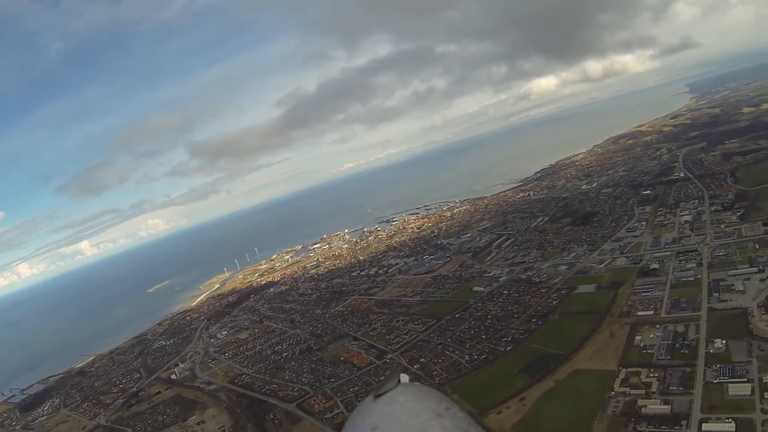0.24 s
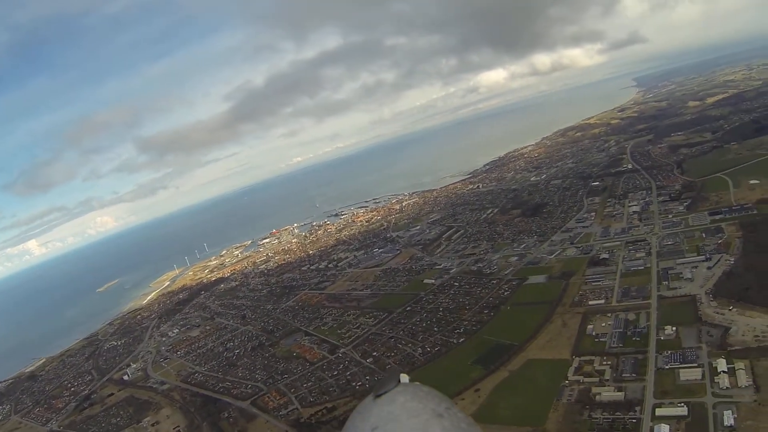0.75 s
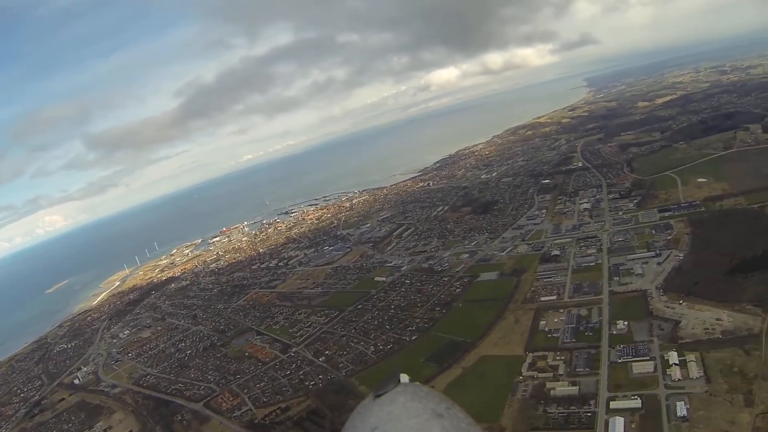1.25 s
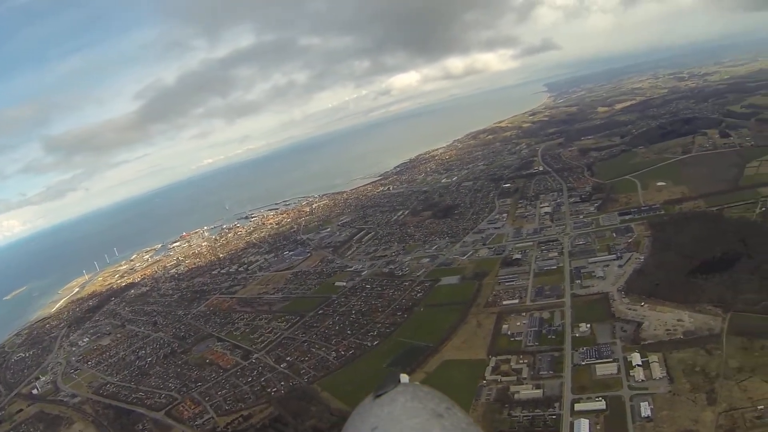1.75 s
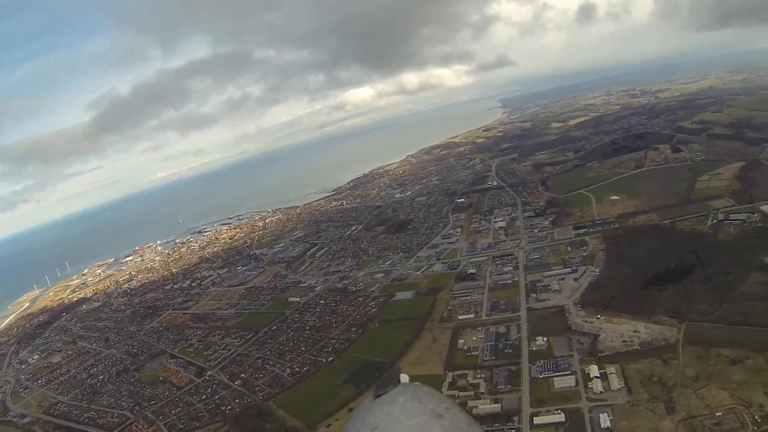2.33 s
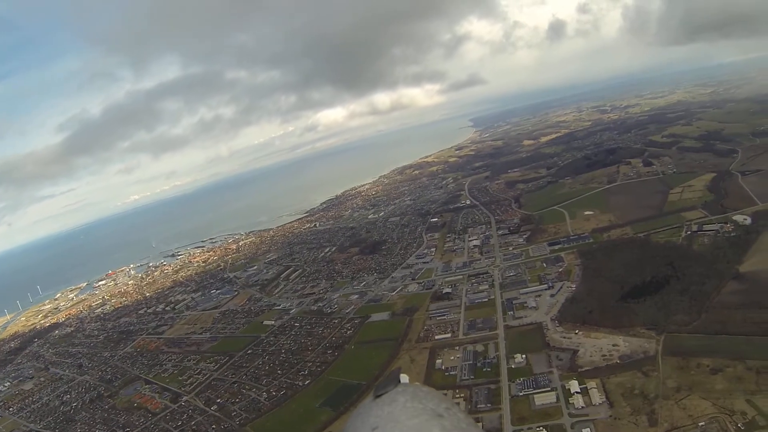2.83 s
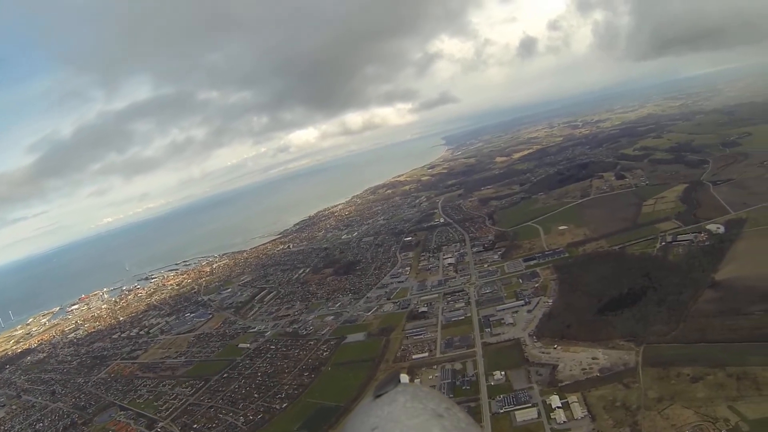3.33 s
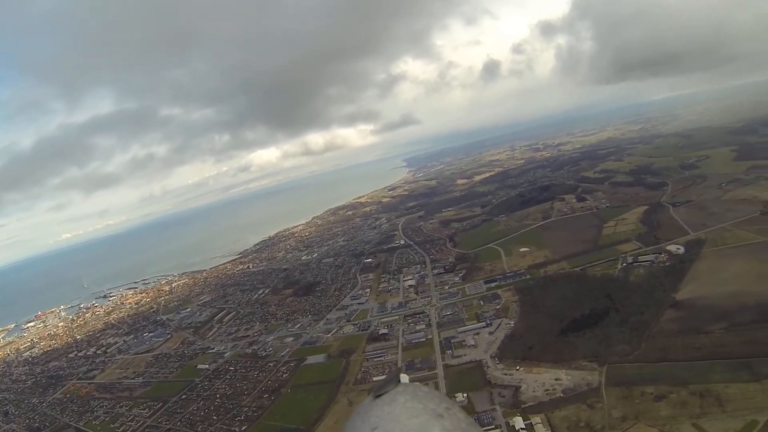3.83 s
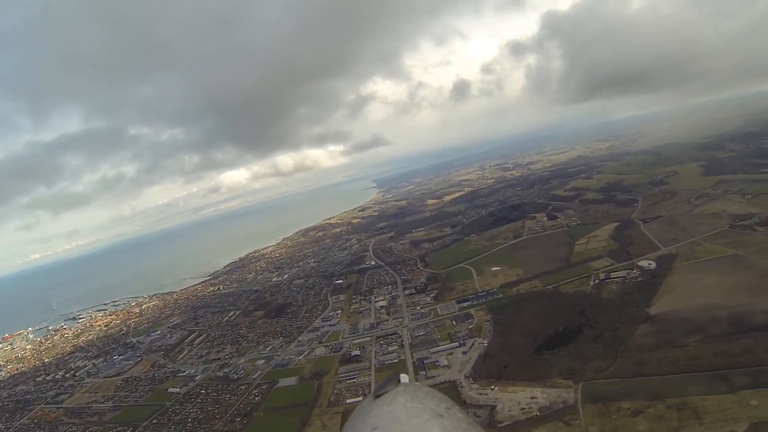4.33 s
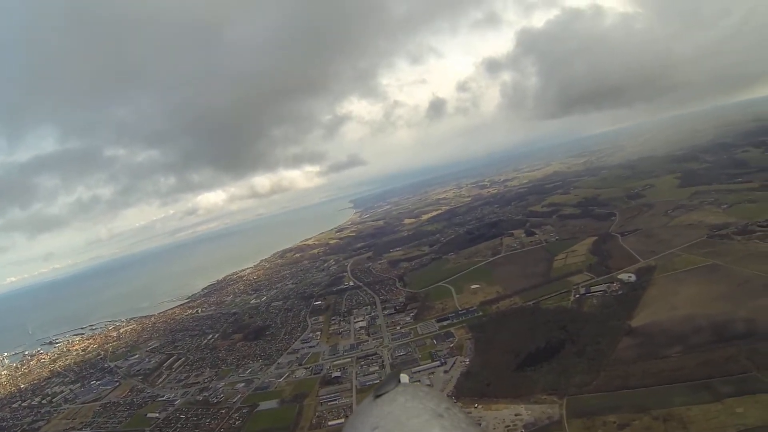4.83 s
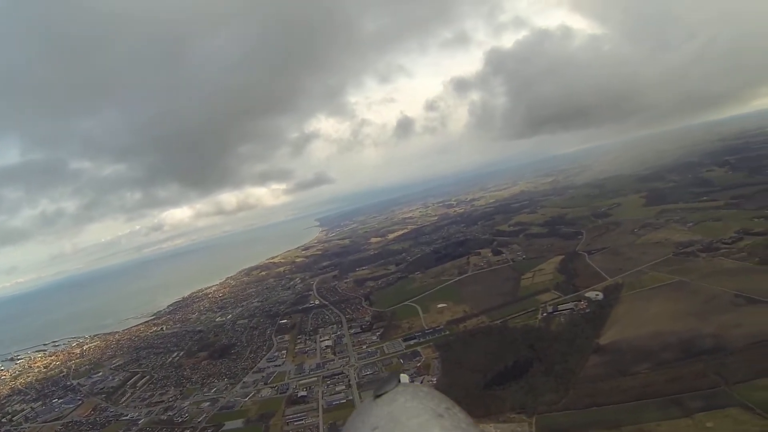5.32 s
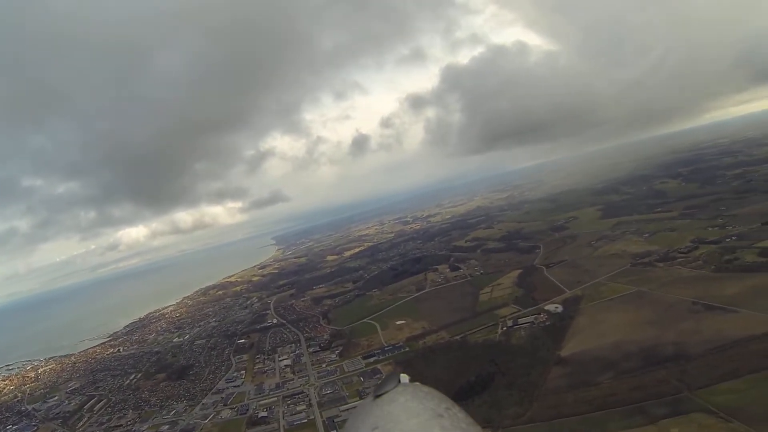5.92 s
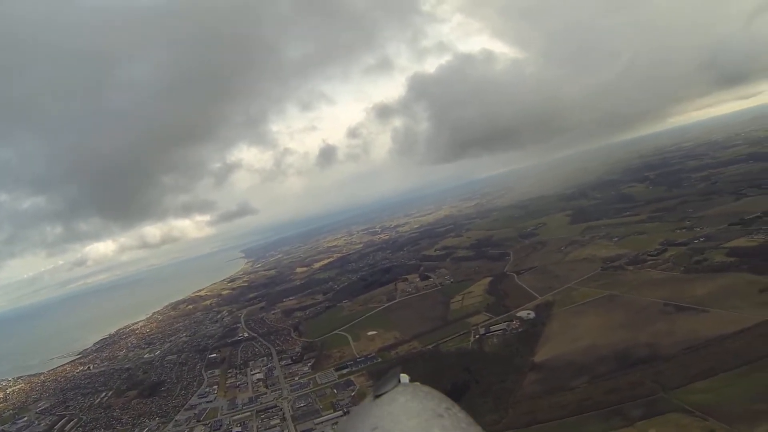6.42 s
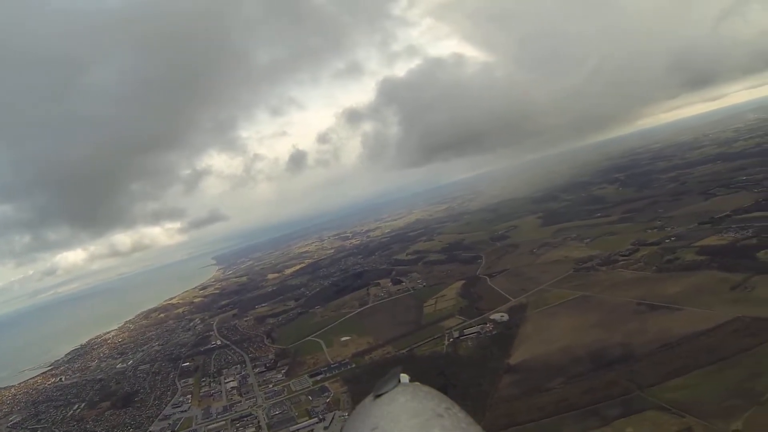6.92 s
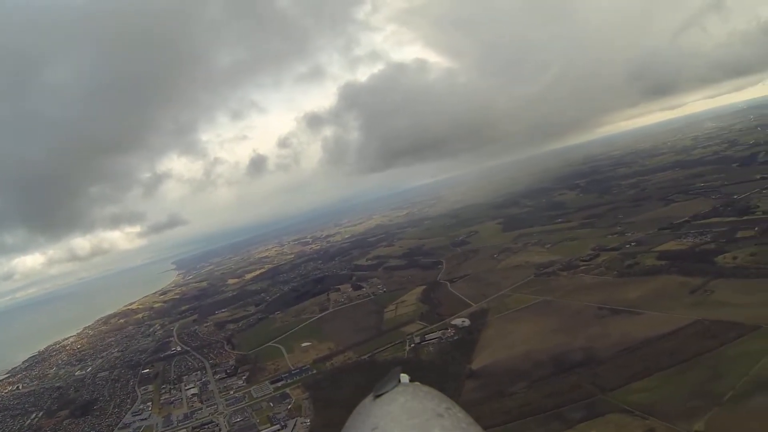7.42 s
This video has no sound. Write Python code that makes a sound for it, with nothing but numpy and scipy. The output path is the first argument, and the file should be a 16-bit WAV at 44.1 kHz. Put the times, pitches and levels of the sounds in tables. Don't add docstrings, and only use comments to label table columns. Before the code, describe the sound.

High in open air on a motorless glider, wind batters a small microphone from the first moment. Sharp low thumps arrive irregularly, several each second, over uneven deep rumble, flutter and soft hiss. After each hard blow the level dips in tiny steps and swells back. Flow builds early, eases after three seconds, gusts hardest near six and a half, then drops.

```python
import sys
import numpy as np
from scipy import signal
from scipy.fft import rfft, irfft, next_fast_len
from scipy.io import wavfile
from scipy.ndimage import uniform_filter1d

SR = 44100
rng = np.random.default_rng(int(sys.argv[2]) if len(sys.argv) > 2 else 0)


def wav_record(signal):
    frames = np.transpose(np.atleast_2d(signal))
    bounded = np.clip(frames, -1, 1)
    quanta = np.round(bounded * 32767).astype(np.int16)
    wavfile.write(sys.argv[1], SR, quanta)


def field_ratio(decibels):
    return 10 ** (np.asarray(decibels, dtype=float) / 20)


N = 337806


def add(mix, s, sound):
    start = round(s * SR) - len(sound) // 2
    part = mix[max(start, 0):start + len(sound)]
    part += sound[max(-start, 0):][:len(part)]


def evened(x):
    return x / np.sqrt(np.mean(x ** 2) + 1e-20)


def pressure_pulses(rows):
    t = np.arange(-1500, 1500) / SR
    pulses, hold = np.zeros(N), np.zeros(N)
    for s, peak, width_ms, *_ in rows:
        u = t / (width_ms / 1000)
        point = np.exp(1.565 * (0.25 - np.sqrt(0.15 ** 2 + u ** 2)))
        undershoot = np.exp(-(u / 3.53) ** 2)
        add(pulses, s, peak * (1.6 * point - 0.35 * undershoot))
        add(hold, s, np.exp(-(u / 0.47) ** 2))
    return pulses, np.clip(hold, 0, 1)


# t/s, signed crest after the gain [full scale], width/ms, gain cut/dB
STRONG_BUFFETS = [(0.13, 0.71, 1.8, 0), (0.233, 0.44, 2.1, 3.5), (0.563, -0.35, 2.3, 2.5),
                  (0.6291, -0.86, 2.1, 6.5), (0.761, -0.99, 2.2, 5), (0.9372, 0.68, 3.4, 8.5),
                  (1.2692, -0.47, 3.2, 6.5), (1.539, 0.63, 3.6, 7.5), (1.825, -0.73, 2.5, 5),
                  (2.0773, 0.6, 2.36, 7.5), (2.473, 0.52, 5.1, 8), (2.676, 0.67, 3, 4.5),
                  (3.037, 0.88, 2.8, 5.5), (3.239, 0.51, 3.5, -0.5), (3.6316, 0.4, 3.2, 4.5),
                  (3.9832, 0.48, 5.5, 2.5), (4.111, 0.59, 2.5, 7), (4.6808, 0.45, 2.3, 1.5),
                  (4.8249, -0.8, 1.9, 4.5), (5.3835, 0.62, 3, 6), (5.6848, 0.55, 1.5, 5.5),
                  (5.9125, -0.8, 2.6, 9.5), (6.066, 0.25, 3.7, 2.5), (6.3125, -0.16, 6.2, 10.5),
                  (6.4577, -0.46, 4, 4), (6.562, 0.35, 5, 9.5), (6.9093, -0.71, 1.4, 6.5),
                  (7.1755, 0.38, 3.7, 2), (7.4474, -0.53, 5.2, 6), (7.5722, 0.47, 2, 3.5)]
# t/s, signed crest after the gain [full scale], width/ms
MILD_JOLTS = [(0.3031, 0.44, 4.8), (0.3827, 0.34, 4.7), (0.764, 0.35, 5), (1.0717, -0.32, 1.4),
              (1.1344, -0.33, 5.3), (1.2182, -0.74, 1.2), (1.3612, 0.36, 3), (1.4529, -0.16, 4.2),
              (1.6537, -0.41, 4.8), (1.9405, -0.44, 1.6), (2.002, 0.37, 5.2), (2.277, 0.58, 2.9),
              (2.3549, 0.31, 2.7), (3.1932, 0.49, 3.1), (3.4372, 0.35, 4.8), (3.6994, 0.25, 7.5),
              (3.8212, 0.48, 1.9), (4.0858, -0.35, 2.9), (4.3281, 0.34, 1.8), (4.4085, 0.28, 2.8),
              (4.6324, -0.26, 7.2), (4.9149, 0.48, 1.8), (5.1014, -0.45, 1.5), (5.161, 0.32, 1.8),
              (5.223, 0.43, 2.1), (5.802, 0.46, 5.7), (6.0159, -0.52, 1.33), (6.1691, -0.47, 2.3),
              (6.3083, -0.63, 4.3), (6.6248, 0.37, 1.8)]


def buffets(cut_db):
    rows = []
    for s, crest, width_ms, *_ in STRONG_BUFFETS + MILD_JOLTS:
        rows.append((s, crest * field_ratio(cut_db[round(s * SR) - 1]), width_ms))
    return pressure_pulses(rows)


def gain_cut(step_db=1.18):
    jolt_cut_db, recover_s = 2.5, 0.15
    fall_widths = 1.2
    t, cut_db = np.arange(N) / SR, np.zeros(N)
    cuts = STRONG_BUFFETS + [(*row, jolt_cut_db) for row in MILD_JOLTS]
    paces = np.cumsum(rng.random((len(cuts), 24)) ** 2, axis=1)
    for (s, _, width_ms, depth_db), pace in zip(cuts, paces):
        since = t[round(s * SR):][:SR] - s
        progress = since / (fall_widths * width_ms / 1000)
        fallen = np.interp(progress, np.linspace(0, 1, len(pace)), pace / pace[-1])
        slide = fallen * max(depth_db, 0)
        stepped = step_db * np.ceil(slide / step_db)
        stair = slide + 0.79 * (stepped - slide)
        cut_db[round(s * SR):][:SR] += stair * np.exp(-since / recover_s)
    return cut_db


def ripples():
    count, peak = 90, 0.28
    narrow_ms, wide_ms = 1.9, 8.4
    place, sign, size, breadth = rng.random((count, 4)).T
    s = (np.arange(count) + place) * N / SR / count
    width_ms = narrow_ms * (wide_ms / narrow_ms) ** breadth
    signed_peak = np.sign(sign - 0.5) * peak * (0.64 + 0.75 * size)
    return list(zip(s, signed_peak, width_ms))


# t/s, signed peak after the gain [full scale], width/ms
CLEAR_SWINGS = [(0.202, -0.27, 3), (0.6946, 0.14, 3.3), (1.0547, 0.33, 6.9), (1.3366, -0.44, 0.98),
                (1.464, 0.44, 2.7), (1.802, -0.37, 1.2), (1.9126, -0.65, 1.3), (2.1793, -0.38, 1.75),
                (2.552, -0.31, 3.5), (2.6396, 0.27, 5.1), (2.8083, 0.42, 0.78), (2.9913, 0.35, 2.2),
                (3.3227, -0.42, 0.78), (3.3349, -0.42, 2.8), (3.536, 0.24, 4.2), (3.6035, -0.4, 1.34),
                (3.8077, -0.57, 1.9), (4.3408, -0.56, 1.9), (4.5134, 0.36, 6.9), (5.4622, 0.39, 4),
                (5.5271, -0.25, 1.2), (5.6354, -0.45, 2.8), (5.7527, 0.3, 2.4), (6.5577, -0.5, 5.8),
                (6.7485, -0.33, 2), (6.7896, 0.52, 2.6), (7.1158, -0.31, 4), (7.2834, 0.35, 1.2),
                (7.332, 0.25, 7.3), (7.6372, 0.36, 0.92)]


def lesser_swings():
    return pressure_pulses(CLEAR_SWINGS + ripples())


# t/s, peak level/dB, f/Hz
SMALL_EDDIES = [(0.69, -24.5, 455), (1.02, -24.5, 479), (1.334, -25.5, 900), (1.801, -24, 600),
                (1.883, -22, 560), (2.067, -21, 600), (2.357, -21.5, 660), (2.465, -22.5, 490),
                (2.645, -25, 600), (2.805, -26.5, 536), (2.84, -23.5, 600), (3.187, -24.5, 563),
                (3.272, -30, 600), (3.333, -28.5, 900), (3.389, -24.5, 600), (3.573, -22.5, 600),
                (3.787, -27, 493), (3.933, -24, 600), (3.975, -21, 654), (4.507, -16.5, 450),
                (4.642, -23, 514), (4.775, -19, 600), (5.426, -21, 483), (5.524, -28, 507),
                (5.681, -22, 662), (5.991, -26.5, 484), (6.166, -20, 597), (6.207, -23.5, 625),
                (6.957, -21, 457), (7.385, -21.5, 446)]


def snaps():
    out, t = np.zeros(N), np.arange(-600, 600) / SR
    phases = rng.random(len(SMALL_EDDIES))
    for (s, db, hz), phase in zip(SMALL_EDDIES, phases):
        cycles = t * hz / np.where(t < 0, 0.35, 0.8)
        swing = np.cos(2 * np.pi * (hz * t + phase))
        add(out, s + 0.0015, field_ratio(db + 2.5) * swing * np.exp(-cycles ** 2))
    return out


def stirred():
    lift_db, t = np.zeros(N), np.arange(-900, 900) / SR
    for s, db, _ in SMALL_EDDIES:
        bell = np.exp(-(t / np.where(t < 0, 0.003, 0.009)) ** 2)
        add(lift_db, s + 0.0038, np.clip(0.36 * (db + 30), 0, 8) * bell)
    return lift_db


# t/s, level/dB, f/Hz
HOUSING_CREAK = (1.995, -36.5, 5600)


def creak():
    out, t = np.zeros(N), np.arange(-600, 600) / SR
    s, db, hz = HOUSING_CREAK
    add(out, s, field_ratio(db + 5) * np.sin(2 * np.pi * hz * t) * np.exp(-(t * hz / 0.82) ** 2))
    return out


# t/s, lift level/dB
ROUGH_PUFFS = [(0.02, 5.5), (0.12, 8), (0.54, 5), (0.74, 4.5), (1.07, 1.5), (1.34, 3), (1.45, 7.5),
               (1.9, 3.5), (2.19, 6), (2.26, 3.5), (2.45, 2.5), (2.821, 3), (3.0, 0.5), (3.2, 8.5),
               (3.33, 1), (3.53, 2), (3.61, 4), (3.81, 1.5), (3.96, 3.5), (4.34, 3), (4.52, 0), (4.78, 4.5),
               (5.05, 2.5), (5.2, 5), (5.37, 6), (5.9, 4.5), (6.5, 3), (6.76, 4), (7.11, 5), (7.58, 5)]


def puffs():
    puff_s = 0.036
    lift_db, t = np.zeros(N), np.arange(-6000, 6000) / SR
    for s, db in ROUGH_PUFFS:
        add(lift_db, s, db * np.exp(-(t / puff_s) ** 2))
    return lift_db


def lumps(top_hz):
    size = next_fast_len(N, real=True)
    hz = np.fft.rfftfreq(size, 1 / SR)
    response = (hz > 5) / (1 + (hz / top_hz) ** 2)
    return evened(irfft(rfft(rng.standard_normal(N), size) * response, size)[:N])


def colour(x, points, lo_hz, hi_hz):
    size = next_fast_len(len(x), real=True)
    hz = np.fft.rfftfreq(size, 1 / SR) + 1
    f, db = np.transpose(points)
    edges = np.sqrt(1 / (1 + (lo_hz / hz) ** 4) / (1 + (hz / hi_hz) ** 4))
    response = field_ratio(np.interp(np.log(hz), np.log(f), db)) * edges
    return evened(irfft(rfft(x, size) * response, size)[:len(x)])


# t/s, gust level/dB
GUSTS = [(0.0, -8), (0.45, -2.5), (0.85, 2), (1.2, 3.5), (1.5, 2), (2.05, -1.5), (2.5, 0), (3.1, -3.5),
         (3.7, -2.5), (4.0, -1.5), (4.35, 0.5), (4.65, -1), (4.95, 2.5), (5.6, -3), (6.101, 1), (6.5, 6),
         (7.0, -3), (7.66, -1)]
# f/Hz, level/dB per Hz
PORT_SPECTRUM = [(7.1, -37), (12, -0.5), (32, 0), (83, -6), (254, -14.5), (696, -23.5), (1500, -35.5),
                 (1950, -72.5), (3300, -120)]
# f/Hz, level/dB per Hz
RUSH_SPECTRUM = [(290, -27), (500, -5), (1980, -16.5), (2720, -25.5), (3780, -25.5), (5010, -34),
                 (9000, -40.5), (10500, -49.5), (13600, -77.5), (22000, -120)]


def airflow():
    flow_db = np.interp(np.arange(N) / SR, *np.transpose(GUSTS))
    gust = lumps(top_hz=24.6)
    whirl = 0.75 * lumps(top_hz=42.7) + 0.4 * stirred()
    puff_db = puffs()
    noise = rng.standard_normal((4, N))

    strength = field_ratio(2.66 * np.minimum(rng.exponential(1, N), 4))
    eddies = noise[1] * (rng.random(N) < 350 / SR) * strength
    tumble = 0.74 * evened(eddies) + 0.45 * noise[0]

    rumble = colour(tumble, PORT_SPECTRUM, 12, 103.4) * field_ratio(1.7 * gust)
    flutter = colour(tumble, PORT_SPECTRUM, 139, 462) * field_ratio(2.1 * gust + 3.8 * whirl + 1.37 * puff_db)
    roar = colour(noise[2], RUSH_SPECTRUM, 537, 2490) * field_ratio(0.5 * gust + 2.5 * whirl + 0.6 * puff_db)
    hiss = colour(noise[3], RUSH_SPECTRUM, 1524, 30000) * field_ratio(0.6 * gust + 0.5 * whirl + 0.42 * puff_db)

    low = field_ratio(-13 + 0.73 * flow_db) * evened(rumble) + field_ratio(-18.5 + 0.69 * flow_db) * evened(flutter)
    high = field_ratio(-34 + 0.79 * flow_db) * evened(roar) + field_ratio(-42.5 + 0.68 * flow_db) * evened(hiss)
    return low, high


def scene():
    cut_db = gain_cut()
    strong, hold = buffets(cut_db)
    lesser, nudge = lesser_swings()
    low, high = airflow()
    eased = field_ratio(uniform_filter1d(cut_db, size=300))
    ceiling = 0.27 * eased
    yielded = 1 - 0.85 * np.maximum(hold, nudge)
    low = ceiling * np.tanh(low / ceiling) * yielded
    small = 0.92 * lesser + snaps() + creak()
    return (low + 0.88 * strong + high + eased * small)[None]


def band_limit(x):
    return signal.sosfilt(signal.butter(12, 15700, fs=SR, output="sos"), x)


def record(dry):
    rounding = signal.butter(2, 6000, fs=SR, output="sos")
    gain = signal.sosfilt(rounding, field_ratio(-gain_cut()) - 1) + 1
    x = 1.1 * np.tanh(dry * gain / 1.1)
    x = signal.sosfilt(signal.butter(4, 13000, fs=SR, output="sos"), x)
    x = x + field_ratio(-92) * rng.standard_normal(x.shape)
    return band_limit(x)


dry = scene()
out = record(dry)
wav_record(out)
```